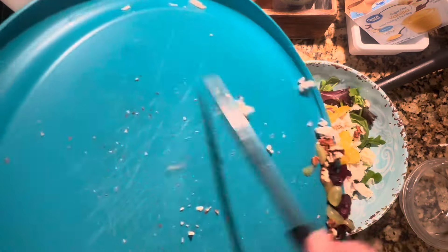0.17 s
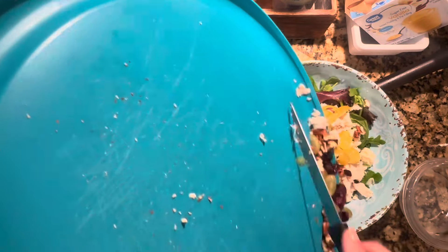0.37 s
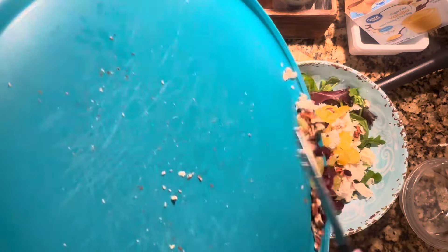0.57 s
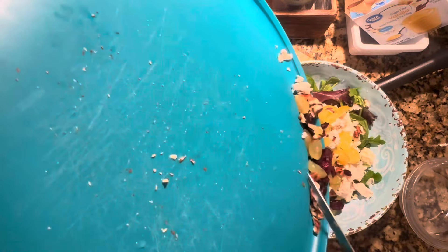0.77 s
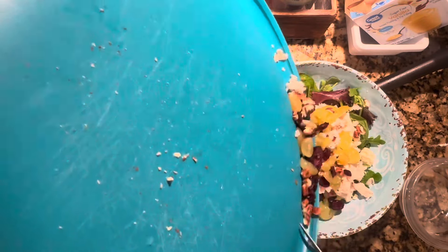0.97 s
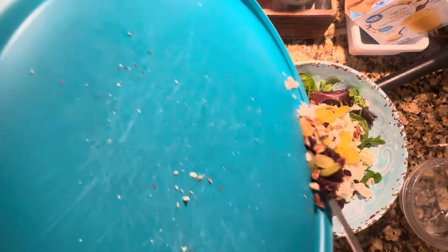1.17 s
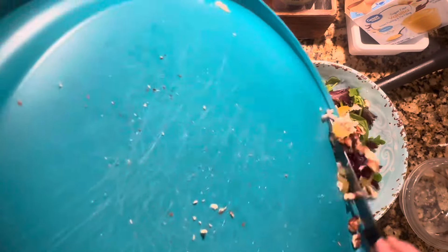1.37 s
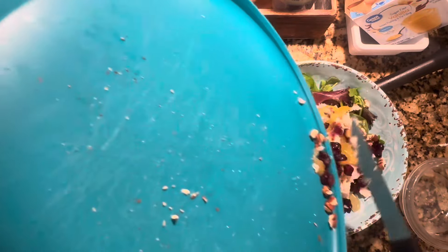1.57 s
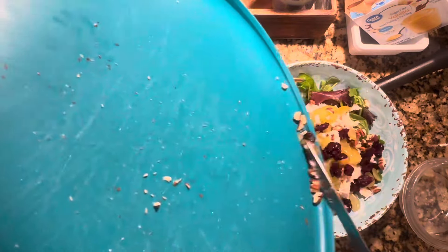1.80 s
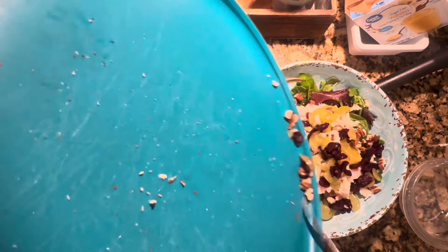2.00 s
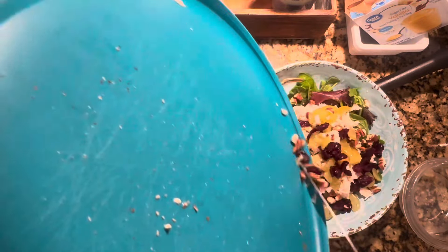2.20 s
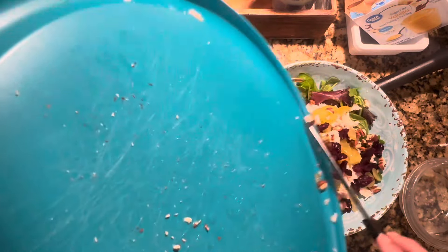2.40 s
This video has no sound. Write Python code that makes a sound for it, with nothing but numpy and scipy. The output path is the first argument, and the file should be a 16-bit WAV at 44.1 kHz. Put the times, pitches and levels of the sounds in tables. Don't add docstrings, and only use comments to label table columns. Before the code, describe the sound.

A kitchen knife taps and scrapes across a thin plastic cutting board in a quiet kitchen

```python
import sys
import numpy as np
from scipy import signal
from scipy.fft import rfft, irfft, next_fast_len
from scipy.io import wavfile
from scipy.ndimage import uniform_filter1d

SR = 44100
rng = np.random.default_rng(int(sys.argv[2]) if len(sys.argv) > 2 else 0)


def volts_from_db(level):
    exponent = np.asarray(level, float) / 20
    return 10 ** exponent


def dump_mix(stems):
    frames = np.atleast_2d(stems).T
    limited = np.clip(frames, -1, 1)
    pcm = np.round(limited * 32767).astype(np.int16)
    wavfile.write(sys.argv[1], SR, pcm)


N = 108045
SIZE = next_fast_len(N + SR // 2)
HZ = np.maximum(np.arange(SIZE // 2 + 1) * SR / SIZE, 10)
TIME = np.arange(N) / SR


def rms_one(x):
    return x / np.sqrt(np.mean(x ** 2) + 1e-20)


def peak_one(spectrum):
    return spectrum / np.abs(irfft(spectrum, SIZE)).max()


def at_hz(points):
    p = np.array(points)
    return np.interp(np.log(HZ), np.log(p[:, 0]), p[:, 1])


def shape(x, response):
    return irfft(rfft(x, SIZE) * response, SIZE)[..., :N]


def at(s):
    return np.exp(-2j * np.pi * HZ * s)


def mode(hz, t60):
    r = volts_from_db(-60 / (t60 * SR))
    w = 2 * np.pi * hz / SR
    z = at(1 / SR)
    return np.sin(w) * z / (1 - 2 * r * np.cos(w) * z + r * r * z * z)


def soft(hz):
    return 1 / (1 + (HZ / hz) ** 3)


def drift(rate_hz):
    r = np.exp(-2 * np.pi * rate_hz / SR)
    noise = rng.standard_normal(N + SR)
    return rms_one(signal.lfilter([1], [1, -2 * r, r * r], noise)[SR:])


def grains(rate, spread_db):
    sizes = volts_from_db(spread_db * np.minimum(rng.exponential(1, N), 5))
    signs = rng.choice([-1, 1], N)
    return sizes * signs * (rng.random(N) < rate / SR)


def bending():
    travel_s = 0.0032
    rim_ratio, rim_db = 2.3, -16.5
    phase = 4 * np.pi * travel_s * np.sqrt(1000 * HZ)
    early = at(-travel_s * 0.455)
    return early * (np.exp(-1j * phase) + volts_from_db(rim_db) * np.exp(-1j * rim_ratio * phase))


# f/Hz, level/dB, t60/s
PLATE_MODES = [(178.8, 1.5, 0.071), (350, -12.5, 0.052), (410.7, -8, 0.057), (439, -12, 0.14),
               (492.7, -10, 0.14), (605.6, -1.5, 0.074), (653, -10, 0.063), (807, -4, 0.049),
               (1090, 12.5, 0.01)]


def plate_modes():
    return [volts_from_db(db) * mode(hz, t60) for hz, db, t60 in PLATE_MODES]


# f/Hz, level/dB
CRACK_COLOUR = [(180, -33), (300, -7), (656, 2), (3290, -1.5), (3700, -5), (4830, 1), (6500, -5),
                (9880, -40), (16000, -80.5)]


def crack(hardness):
    return peak_one(volts_from_db(at_hz(CRACK_COLOUR)) * hardness * bending())


# t/s, crack level/dB, plate ring level/dB, hardness above 4 kHz/dB, struck spot f/Hz (plate
TAPS = [(0.2084, -6, -10, -14.5, 352), (0.2255, -11, -14, -3.5, 350), (0.2389, -18.5, -23.5, 15, 610),
        (0.4987, -18, -22, 0, 517), (0.514, -17.5, -17, -8, 170), (0.5188, -25, -22.5, 0, 620),
        (0.527, -30, -29, 10, 625), (0.6377, -23, -58, 26, 608), (0.7898, -34, -73, -7, 595),
        (0.9067, -22, -22.5, -3, 417), (0.982, -18, -25.5, -6, 370), (1.5557, -24.5, -63, 25, 797),
        (1.7, -7.5, -19, 3, 657), (1.7124, -18, -24.5, 13, 206), (1.9804, -24.5, -39.5, -1, 980),
        (2.03, -13.5, -30.5, 5, 533), (0.5465, -34, -29.5, -5, 620), (1.7012, -19, -16, -12, 344),
        (2.0315, -37, -25, -3, 177)]


def taps():
    out, wave, modes = 0, bending(), plate_modes()
    mode_hz = np.array(PLATE_MODES)[:, 0]
    chances = volts_from_db(rng.normal(0, 4.97, (len(TAPS), len(modes))))
    spot_octaves = 0.35
    for (s, crack_db, ring_db, hard_db, spot_hz), chance in zip(TAPS, chances):
        octaves = np.log2(mode_hz / spot_hz)
        near = chance / (1 + (octaves / spot_octaves) ** 2) ** 1.24
        ring = volts_from_db(ring_db + 4) * sum(g * m for g, m in zip(near, modes))
        snap = crack(soft(4000 * volts_from_db(np.clip(hard_db, -6, 12))))
        out = out + at(s) * (volts_from_db(crack_db - 6.5) * snap + wave * ring)
    return irfft(out, SIZE)[:N]


# t/s, level/dB, f/Hz, t60/s
WOBBLES = [
    (0.211, -24, 108, .15),
    (0.233, -34, 128.4, 0.089),
    (0.495, -22.5, 91.7, 0.17),
    (0.707, -33, 86.4, 0.099),
    (.905, -21.5, 80.8, 0.23),
    (0.987, -24.5, 82, 0.093),
    (1.704, -18, 93, 0.12),
    (1.988, -29, 82.6, 0.15),
    (2.034, -18.5, 82, 0.17),
]


def wobbles():
    out, wave = 0, bending()
    for s, db, hz, t60 in WOBBLES:
        swing = mode(hz, t60) * mode(hz, t60 * 0.15)
        out = out + volts_from_db(db) * at(s) * wave * peak_one(swing)
    return irfft(out, SIZE)[:N]


# t/s, peak level/dB, colour f/Hz
TICKS = [(0.2573, -9, 1570), (0.2704, -14, 1100), (0.2952, -12.5, 1600), (0.3232, -20.5, 2090),
         (0.5464, -22, 2000), (0.2445, -10, 600), (0.2645, -15, 1300), (0.2715, -8.5, 4820),
         (0.2765, -23.5, 4600), (0.289, -20, 1800), (0.3005, -22.5, 1200), (0.3045, -31.5, 4180),
         (0.3245, -24, 4900), (0.338, -22, 670), (0.5325, -26, 5600), (0.5365, -25, 6100),
         (0.6375, -29, 4600), (0.79, -26.5, 2800), (0.7933, -25.5, 2000), (0.286, -16, 5800),
         (0.2918, -27, 5800), (0.3319, -31, 5030), (0.817, -35, 1300), (0.917, -34, 2000),
         (0.935, -33, 2210), (1.014, -26, 2040), (1.106, -28, 1100), (1.154, -25, 1720),
         (1.171, -28.5, 1740), (1.186, -20, 456), (1.296, -38, 1110), (1.328, -29, 1090),
         (1.351, -28.5, 1300), (1.378, -31, 1400), (1.387, -30.5, 1190), (1.424, -35, 1770),
         (1.442, -36, 790), (1.455, -31, 1400), (1.49, -32, 5800), (1.901, -49, 1470), (2.083, -42, 875),
         (2.089, -28.5, 2180), (2.118, -24, 3270), (2.199, -29, 1670), (2.389, -36, 1410),
         (0.5891, -27, 1170), (0.6484, -36, 1078), (0.7038, -15.5, 1040), (0.8904, -29.5, 2060),
         (1.0824, -21.5, 2400), (1.1997, -20.5, 1160), (1.2304, -29, 1110), (1.2695, -21.5, 1210),
         (1.5813, -27, 1860), (1.9174, -37.5, 1836), (2.003, -24, 2220), (2.011, -28, 1840),
         (2.154, -18.5, 715), (2.1745, -23.5, 1480), (2.2263, -24, 1740)]


def ticks():
    out, wave, click = 0, bending(), crack(1)
    for s, db, hz in TICKS:
        ring = wave * mode(hz, 0.0065 * min(1, 2500 / hz))
        snap = click * soft(2 * hz) * (1 - soft(hz / 3))
        out = out + volts_from_db(db - 3) * at(s) * (ring + volts_from_db(-5) * snap)
    return irfft(out, SIZE)[:N]


# f/Hz, level/dB
SLIP_COLOUR = [(88, -57), (150, -16), (244, -6.5), (1560, 3.5), (7770, -16), (10400, -23), (11000, -9),
               (14500, -25.5), (16000, -41)]
SLIPS_PER_S = 6000


def slip_colour():
    return volts_from_db(at_hz(SLIP_COLOUR))


def grit_puffs():
    puff_db, puff_s = -16.5, 0.0054
    puff = np.zeros((2, N))
    for s, db, hz in TICKS:
        puff[:, int(s * SR)] = volts_from_db(db + puff_db) * np.array([1, min(hz / 3000, 1) ** 2])
    for s, db, _, hard_db, _ in TAPS:
        puff[:, int(s * SR)] = volts_from_db(db + puff_db) * np.array([1, min(volts_from_db(hard_db), 1)])
    dark, bright = signal.lfilter([1], [1, -np.exp(-1 / (puff_s * SR))], puff)
    grit = rms_one(shape(grains(SLIPS_PER_S, 2.0), slip_colour()))
    return dark * shape(grit, soft(2020.0)) + bright * shape(grit, 1 - soft(1100.0))


def wandering(x):
    out, spectrum = 0, rfft(x, SIZE)
    edge_width = 0.02
    for hz, offset in zip(np.geomspace(200, 16000, 20), rng.uniform(-.1, .1, 20)):
        distance = np.log(HZ / hz)
        band = spectrum * np.clip(1 - np.abs(distance) / (np.log(80) / 19), 0, 1)
        sing = 1.25 / (1 + (distance - offset) ** 2 / edge_width ** 2)
        out = out + irfft(band, SIZE)[:N] * volts_from_db(2.8 * drift(12.0))
        out = out + irfft(band * sing, SIZE)[:N] * np.clip(drift(4), 0, 2)
    return rms_one(out)


# t/s, pressure level/dB, brightness/dB
STROKES = [
    [(0, -35, -5.5), (.015, -55.5, 12.5), (.1, -74, 15)],
    [(.21, -43, -24), (.25, -27.5, 5), (.3, -27, 7.5), (.33, -43.5, 16.5), (.37, -59, 13.5),
     (.45, -62, 11.5)],
    [(.505, -55, -10), (.515, -32.5, 2.5), (.535, -28.5, 5), (.56, -45, 7.5), (.63, -66.5, 9)],
    [(.639, -61, 12), (.655, -59, 16), (.7, -67, 3)],
    [(.79, -41, -24), (.81, -55.5, -12), (.87, -69, -3)],
    [(.907, -30, -11), (.97, -67, -20)],
]
# t/s, pressure level/dB, brightness/dB
LATE_STROKES = [
    [(.985, -46, -10), (1.01, -45.5, 2), (1.06, -42, 6.5), (1.085, -36.5, 6.5), (1.125, -41, 3),
     (1.155, -37.5, 2), (1.2, -41, 4)],
    [(1.2, -40.5, 5.5), (1.23, -38.5, 11), (1.28, -42.5, 10.5), (1.345, -43.5, 7.5), (1.415, -51, -1.5),
     (1.45, -44.5, -3.5), (1.49, -48.5, 9.5), (1.545, -63.5, 12)],
    [(1.557, -68, 17), (1.6, -48.5, -7), (1.65, -105, 1)],
    [(1.705, -44, 19.5), (1.735, -41.5, 13.5), (1.83, -66.5, 2)],
    [(1.88, -65, -26), (1.92, -50, -7), (1.96, -78, -2)],
    [(2.033, -48, 16), (2.055, -49.5, 1), (2.09, -41, 3.5), (2.13, -41, 15.5), (2.17, -40.5, 8),
     (2.2, -39, -2)],
    [(2.2, -40, -1), (2.24, -46.5, 12), (2.31, -45.5, 6), (2.36, -52, 4.5), (2.395, -43, 6.5),
     (2.45, -93, -13)],
]


def scrape():
    pressure, bright = np.zeros(N), np.zeros(N)
    for rows in STROKES + LATE_STROKES:
        s, db, bright_db = np.transpose(rows)
        inside = (TIME >= s[0]) & (TIME < s[-1])
        pressure[inside] = volts_from_db(np.interp(TIME[inside], s, db))
        bright[inside] = np.interp(TIME[inside], s, bright_db)
    flutter_db = 1.6 * drift(83)
    pressure = uniform_filter1d(pressure, size=90) * volts_from_db(-3.5 + flutter_db)

    wave = bending()
    colour = slip_colour() * wave
    fine = wandering(shape(grains(SLIPS_PER_S, 2.8), colour))
    air = shape(fine, 1 / (1 + (10600 / HZ) ** 40))
    air_gain = 2.0 * np.abs(pressure / pressure.max()) ** 1.1 * volts_from_db(6.4 * drift(9.9))
    fine = fine + air * (air_gain - 1)
    high = shape(fine, 1 / (1 + (4450 / HZ) ** 4))

    catches = grains(900 * volts_from_db(4.5 * drift(25)), 2.2)
    coarse = rms_one(shape(catches, colour / (1 + (HZ / 8700) ** 2)))
    ring = rms_one(shape(catches, wave * sum(plate_modes())))
    return pressure * (fine + (volts_from_db(bright) - 1) * high + volts_from_db(-7) * coarse + volts_from_db(-4.5) * ring)


# f/Hz,
# lead/rad
LEAD = [(0, 0), (860, 0.04), (3960, 0.7), (6550, -1.5), (9300, -1),
        (10200, -np.pi), (13900, -np.pi), (14100, -1.1 * np.pi), (14700, -1.55 * np.pi),
            (15600, -1.85 * np.pi)]
# f/Hz, level/dB
TILT = [(60, 1), (180, 1.5), (550, 4), (1650, -0.5), (4970, -0.5)]


def ports(board):
    port = volts_from_db(at_hz(TILT + [(8000, 0.0061)]) / 2) * np.exp(.5j * at_hz(LEAD))
    gain = 2 / np.maximum(np.abs(port + 1 / port), 1)
    return np.array([shape(board, port * gain), shape(board, gain / port)])


def scatter(board):
    fade_s = 0.0058
    lag = np.arange(2000)
    blur = rng.standard_normal((2, 2000)) * np.exp(-lag / SR / fade_s) / np.sqrt(fade_s * SR / 2)
    return shape(board, rfft(blur, SIZE) / (1 + (3500 / HZ) ** 2 + (HZ / 8000) ** 12))


def kitchen(x):
    t60 = 0.36
    dull = 1 / np.sqrt(1 + (HZ / 7600) ** 2 + (290.0 / HZ) ** 2)
    wet = []
    for lags in rng.uniform(0.011, 0.039, (2, 8)):
        loops = [volts_from_db(-60 * lag / t60) * dull * at(lag) for lag in lags]
        echoes = sum((-1) ** k * g / (1 - g) for k, g in enumerate(loops))
        wet.append(shape(x, echoes))
    return np.array(wet)


# f/Hz, level/dB
ROOM_TONE = [(56, -33), (95, 3.5), (183, -20.5), (422, -11), (935, -27), (3830, -35), (5380, -35),
             (5940, -32.5), (10000, -52.5), (14300, -56), (15500, -100)]
# f/Hz, correlation/1
ROOM_ALIKE = [(60, 1), (240, 0.84), (950, 0.39), (3770, 0.45), (8000, -0.17), (10200, -1.2)]


def room_tone():
    alike = np.clip(at_hz(ROOM_ALIKE), -1, 1)
    colour = volts_from_db(at_hz(ROOM_TONE))
    colour = colour / np.sqrt(np.mean(colour[HZ > 100] ** 2))
    mid, side = rng.standard_normal((2, N))
    mid = shape(mid, colour * np.sqrt((1 + alike) / 2))
    side = shape(side, colour * np.sqrt((1 - alike) / 2))
    return volts_from_db(-53.5) * np.array([mid + side, mid - side])


def mains_hum():
    hum_hz, width_hz = 59.7, 23
    steady = np.sin(2 * np.pi * hum_hz * TIME)
    unsteady = rms_one(shape(rng.standard_normal(N), mode(hum_hz, 2.9 / width_hz) ** 2))
    return volts_from_db(-47) * (steady + 0.67 * unsteady)


def whine():
    return volts_from_db(-92) * np.sin(2 * np.pi * 14060 * TIME) * [[1], [-1]]


def scene():
    board = taps() + wobbles() + ticks() + grit_puffs() + scrape()
    dip = volts_from_db(-9 / (1 + (np.log(HZ / 12300) / 0.054) ** 6))
    board = shape(board, dip / (1 + (HZ / 15900) ** 60))
    near = ports(board) + volts_from_db(1.5) * scatter(board)
    return near + volts_from_db(-22.5) * kitchen(board) + room_tone() + mains_hum() + whine()


def roll_off(x):
    return signal.sosfilt(signal.butter(12, 16640, fs=SR, output="sos"), x)


def record(dry):
    bass_cut = signal.butter(4, 48.0, "high", fs=SR, output="sos")
    mix = signal.sosfilt(bass_cut, dry)
    return roll_off(mix)


dry = scene()
out = record(dry)
dump_mix(out)
```